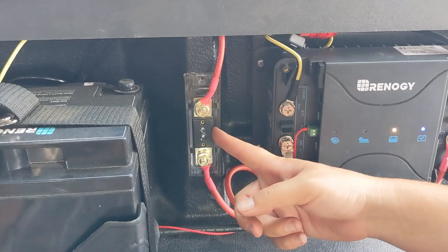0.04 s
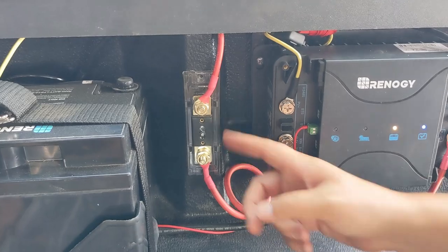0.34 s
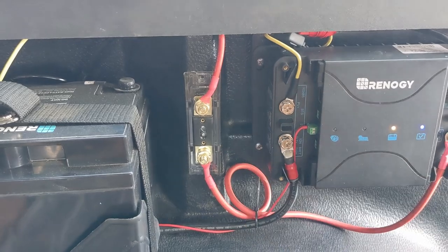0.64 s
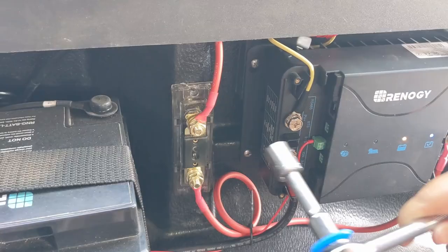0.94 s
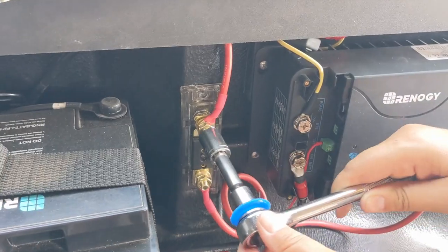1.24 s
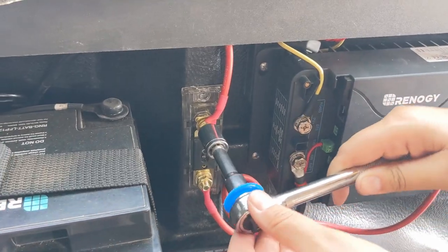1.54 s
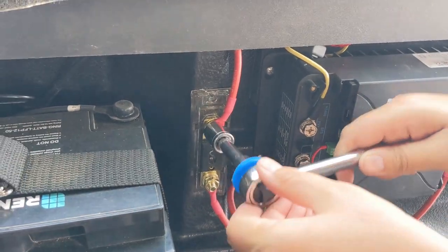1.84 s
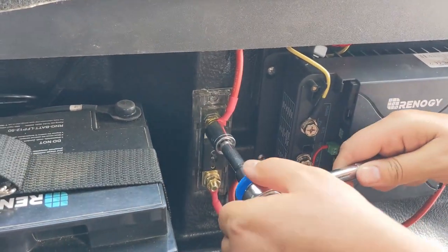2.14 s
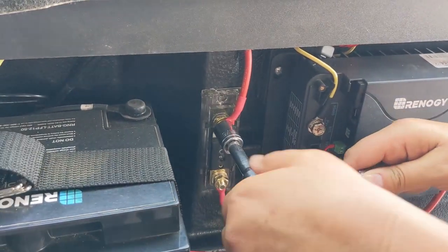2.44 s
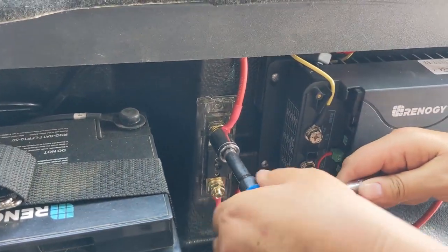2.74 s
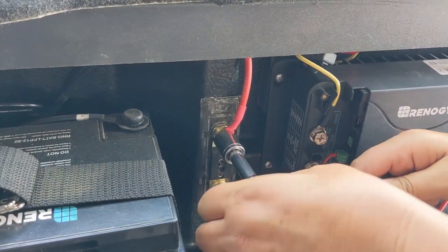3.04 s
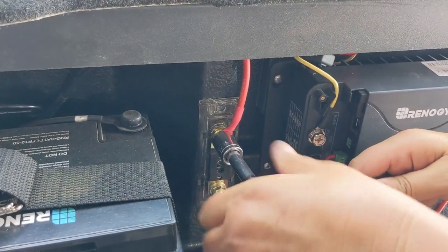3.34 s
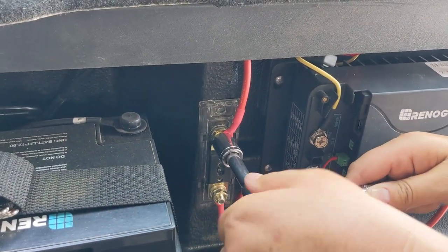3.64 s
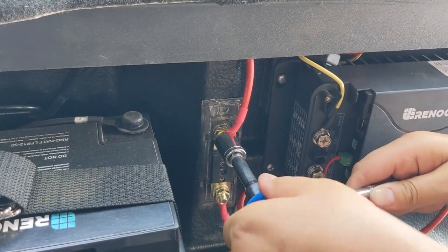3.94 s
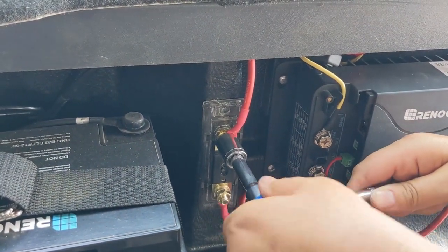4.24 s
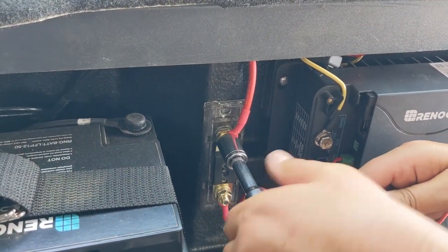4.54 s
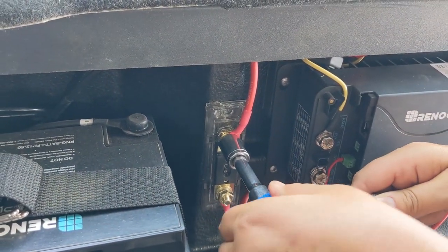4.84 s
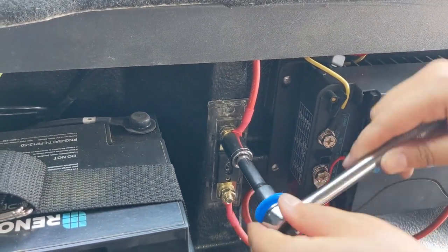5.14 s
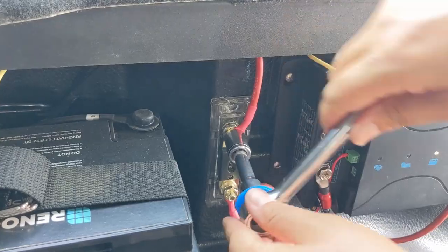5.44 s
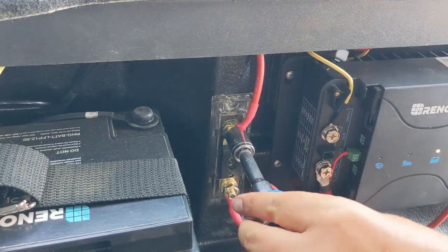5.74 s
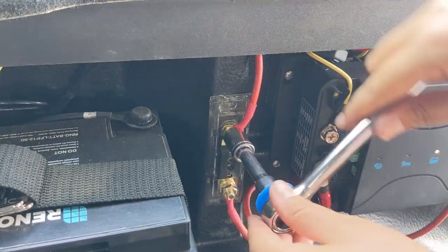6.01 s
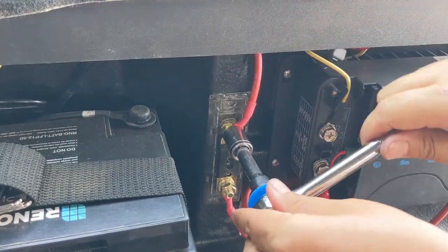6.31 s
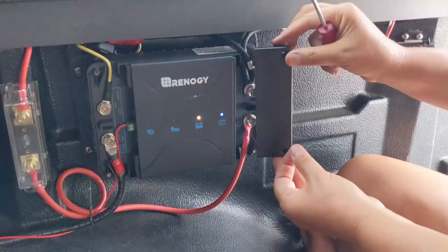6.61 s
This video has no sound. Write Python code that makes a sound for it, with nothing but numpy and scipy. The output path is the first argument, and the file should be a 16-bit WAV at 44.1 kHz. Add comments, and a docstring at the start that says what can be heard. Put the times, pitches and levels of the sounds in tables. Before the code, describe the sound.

A socket ratchet works a nut close to the microphone in a quietly rumbling vehicle cabin. First a motor hums softly and something hollow bumps, both stopping suddenly. The socket seats with a few dull knocks. Quick bursts of crisp steel clicks follow, about four a second, then scattered single ticks and taps, and finally two slightly longer, slower runs of ratchet teeth.

```python
"""Inside a vehicle, close to a phone, a socket ratchet works a nut on a fuse holder screwed to a panel.
Over the cabin rumble a motor hums, a hollow bump sounds, then both sounds cut off abruptly. The socket
knocks onto the nut, fingers spin the ratchet in short buzzing runs, and the handle swings back tooth by
tooth. Each snap of the pawl excites the modes of the steel head and, through the socket, the panel."""
import sys
import numpy as np
from scipy import signal
from scipy.fft import rfft, irfft, next_fast_len
from scipy.io import wavfile
from scipy.ndimage import map_coordinates

SR = 44100
rng = np.random.default_rng(int(sys.argv[2]) if len(sys.argv) > 2 else 0)


def transcribe(u):
    """Save the signal u as a 16-bit wav file named by the first command-line argument.

    u: samples, shape (n,) or (channels, n), limited to [-1, 1]; the rate is SR.
    q: integer samples, one column per channel.
    """
    v = np.clip(np.atleast_2d(u).T, -1, 1)
    q = np.round(v * 32767).astype(np.int16)
    wavfile.write(sys.argv[1], SR, q)


N = 294147
TIME = np.arange(N) / SR

# spectral lines of the motor: (frequency [Hz], level [dB])
HUM_LINES = [(57, -62.5), (113, -52.5), (171, -69), (226, -75.5), (339, -73.5), (400, -92), (468, -80.5),
             (565, -83.5), (872, -88.5)]
# air rushing with the motor: (frequency [Hz], gain [dB])
RUSH_SPECTRUM = [(25, 0), (65, 7), (130, 7.5), (220, -12.5), (380, -7), (600, -17), (1000, -27),
                 (2500, -33.5), (6000, -43), (15000, -53)]
# swells of a thin hiss: (start [s], end [s], level [dB])
HISS_SWELLS = [(0.032, 0.308, -71.5), (0.453, 0.602, -67.5), (0.74, 0.96, -68.5)]
# background noise of the cabin: (frequency [Hz], gain [dB])
CABIN_SPECTRUM = [(15, -42.5), (25, -17), (44, -5.5), (64, 3.5), (77, -5.5), (98, -10.5), (131, -7.5),
                  (163, -25.5), (879, -43), (978, -42.5), (1210, -45.5), (4500, -53), (15000, -62.5)]
# course of the cabin rumble: (time [s], level [dB])
RUMBLE_LEVELS = [(0.96, -62.5), (1.35, -70), (1.9, -62.5), (3.0, -65.5), (5.0, -72), (6.2, -60.5),
                 (6.67, -62.5)]
# socket and fingers striking the nut: (time [s], panel drive [dB], thump drive [dB], tick drive [dB])
NUT_KNOCKS = [(0.334, -55.5, -68, -76), (0.872, -42.5, -55, -53), (1.421, -48.5, -50.5, -61),
              (1.451, -38.5, -41, -64), (1.621, -59, -65, -88), (1.749, -51, -45.5, -74),
              (1.794, -45.5, -48, -76), (1.829, -35, -42, -38), (1.848, -42.5, -45, -54),
              (1.96, -52, -65, -89), (2.082, -71.5, -79, -73), (2.448, -52.5, -58.5, -64),
              (3.157, -50.5, -64.5, -68), (3.408, -45.5, -55, -75), (3.559, -43.5, -47.5, -70),
              (4.019, -49, -75, -71), (4.222, -43, -71, -60.5), (4.348, -50.5, -63, -85),
              (4.58, -54.5, -50.5, -81), (4.693, -49.5, -79.5, -80), (5.056, -54, -81, -87.5),
              (5.098, -47.5, -77, -71), (5.159, -46, -80.5, -67), (5.481, -45.5, -65.5, -66.5),
              (5.508, -39, -55.5, -57), (5.92, -49, -51.5, -82), (5.955, -43, -70, -63.5),
              (6.258, -41, -51.5, -45.5), (6.269, -50, -41.5, -53.5), (6.283, -41, -43.5, -72),
              (6.303, -55.5, -41.5, -75.5)]
# firmness of the socket's seat: (time [s], treble boost and bass cut [dB])
SEAT_TILT = [(1.45, -1.5), (4.5, 1), (5.3, 3), (6.0, -3.5)]
# panel and fuse holder: (frequency [Hz], bandwidth [Hz], gain [dB], left minus right [dB])
PANEL_MODES = [(154, 94, -4, 3.5), (328, 41, 0, -2.5), (396.4, 31, 4, 2), (487, 50, 1, 3.5),
               (569.6, 36, 5, -2), (629.6, 63, 4, -1), (762.5, 69, -6, 4), (856, 63, -6.5, -7),
               (990, 60, -3.5, 0.5), (1241, 170, -9, -1), (1505, 72, -10, 3), (1652, 50, -8, 0),
               (2230, 610, -20, 0)]
# wall behind the panel: (frequency [Hz], bandwidth [Hz], gain [dB], left minus right [dB])
WALL_MODES = [(52.04, 13, -1.5, 2.5), (130, 8, 4, 5.5), (169, 26, -5.5, 5), (228, 10, -12.5, 14)]
# brass stud met by metal: (frequency [Hz], bandwidth [Hz], gain [dB], left minus right [dB])
STUD_MODES = [(945, 130, 9, 0.5), (1520, 130, 5, 4.5), (1970, 310, -6, 8), (2300, 30, 4.5, -3),
              (3640, 460, -13.5, -7), (5150, 250, -4, -4.5)]
# blows that make up the stumbling bump: (time [s], drive [dB])
BUMP_BLOWS = [(0.852, -36.5), (0.866, -38.5), (0.883, -40), (0.899, -41.5)]
# hollow body that is bumped: (frequency [Hz], bandwidth [Hz], gain [dB], left minus right [dB])
HOLLOW_MODES = [(114.3, 8.8, 9.5, 3), (313, 9.8, 2, 3), (341.6, 9.6, 5.5, -2), (418.5, 8, 1.5, 2),
                (468, 21, -4, 3), (569, 9, -5.5, 4), (1262, 17, -16, 14)]
# runs of teeth, from quick finger spins to two slow swings of the handle: (start [s], end [s],
# teeth [count], slowing [0-1], steel drive [dB], swell [dB], panel drive [dB], pawl mode gain [dB])
TOOTH_RUNS = [(2.256, 2.275, 5, 0.09, -31.5, 0.5, -54.5, 9.5), (2.317, 2.351, 4, 0.06, -30.5, 1, -46, 11),
              (2.584, 2.628, 8, .3, -30.5, 4.5, -48.5, 19.5), (2.826, 2.866, 6, 0, -28.5, 2.5, -46.5, 6),
              (3.045, 3.125, 12, 0.24, -36, 3, -47.5, 0), (3.29, 3.358, 14, .1, -32.5, -9.5, -49.5, -7.5),
              (3.517, 3.577, 9, 0.04, -33, 8.5, -44.5, 18.5), (3.772, 3.831, 11, .1, -32, 2.5, -44, 9),
              (4.059, 4.104, 6, 0.33, -36.5, -6, -44.5, 22), (5.192, 5.3554, 7, .11, -31, 0, -42.5, -6),
              (5.992, 6.111, 8, .14, -33.5, -4, -44.5, 17)]
# teeth that slip past the pawl alone: (time [s], steel drive [dB], panel drive [dB])
SINGLE_TEETH = [(2.2925, -30.5, -44), (2.379, -36.5, -58.5), (2.5276, -52.5, -65), (2.6451, -33, -51),
                (2.8892, -30, -44), (3.0649, -27.5, -46), (3.601, -29.5, -44.5), (3.8428, -27.5, -44),
                (4.129, -34.5, -43.5), (4.3972, -33.5, -41.5), (4.4386, -34, -42), (4.5297, -33, -36.5),
                (4.8739, -33, -38.5), (4.9381, -32.5, -38), (6.135, -28.5, -42.5)]
# hold of the fingers on the head: (time [s], grip [0 light to 1 tight])
GRIP_TIGHTNESS = [(2.32, 0.68), (2.75, 0.017), (3.12, 0.49), (3.85, 0.053), (4.1, 0.18), (4.45, 1),
                  (4.9, 0.31), (5.3, 0.51), (6.05, 0.78)]
# ratchet head: (frequency [Hz], bandwidth [Hz], gain [dB], change in a tight grip [dB])
HEAD_MODES = [(4176, 107, 13.5, -9.5), (4393, 120, 7, -8.5), (7690, 110, 5.5, 10.5),
              (12123, 230, 10.5, 12.5)]
# socket and extension bar: (frequency [Hz], bandwidth [Hz])
BAR_MODES = [(5945, 190), (8130, 260), (9070, 120), (9800, 430)]
# broad snap of steel on steel: (frequency [Hz], gain [dB])
SNAP_SPECTRUM = [(300, -21.5), (1200, -8), (2700, -13), (3400, -35.5), (4400, 6.5), (5000, -3),
                 (6000, -0.5), (6900, -1.5), (8200, 3), (9900, -0.5), (10800, -1.5), (12600, 5.5),
                 (14000, -18), (15600, -15)]


def undb(db):
    """Decibels express an amplitude ratio logarithmically; this returns the ratio."""
    return 10 ** (np.asarray(db) / 20)


def panned(db, pan_db):
    """Interchannel level difference: left and right gains lie pan_db apart."""
    return undb(db + np.array([[pan_db], [-pan_db]]) / 2)


def curve(points):
    """Linear interpolation of (time [s], value) points at every sample."""
    return np.interp(TIME, *np.transpose(points))


def unit(x):
    """Normalisation to unit mean power."""
    return x / np.sqrt(np.mean(x ** 2))


def drift(rate_hz):
    """Random modulation: Gaussian values joined by straight lines."""
    return np.interp(TIME * rate_hz, np.arange(2048), rng.standard_normal(2048))


def noise(shared):
    """Partial coherence: white noise at two microphones shares a fraction of its power."""
    return np.sqrt(shared) * rng.standard_normal(N) + np.sqrt(1 - shared) * rng.standard_normal((2, N))


def colour(x, points):
    """Minimum-phase filtering through (frequency [Hz], gain [dB]) points."""
    hz, db = np.transpose(points)
    size = next_fast_len(N + SR // 2) * 2
    bin_hz = np.arange(size // 2 + 1) * SR / size
    cepstrum = irfft(np.interp(np.log(bin_hz + 1), np.log(hz), np.log(undb(db))))
    # folding the cepstrum makes the response causal
    cepstrum[1:size // 2] *= 2
    cepstrum[size // 2 + 1:] = 0
    return irfft(rfft(x, size) * np.exp(rfft(cepstrum)))[..., :N]


def resonate(x, hz, width):
    """Resonance of one damped mode, with unit gain at its centre."""
    return signal.lfilter(*signal.iirpeak(hz, hz / width, fs=SR), x)


def body(force, modes):
    """Modal superposition with alternating signs, roughly keeping the power of white noise."""
    power = sum(undb(db) ** 2 * np.pi * width / SR for _, width, db, _ in modes)
    return sum((-1) ** k * panned(db, pan_db) * resonate(force, hz, width)
               for k, (hz, width, db, pan_db) in enumerate(modes)) / np.sqrt(power)


def impulses(times, db):
    """Impulsive excitation: each blow lasts one sample."""
    return np.bincount((np.asarray(times) * SR).astype(int), undb(db), N)


def contacts(times, levels_db, pans_db, lead_db, rise_s, fall_s, tail_db, tail_s):
    """Incoherent addition of envelopes: each click swells for a few milliseconds, snaps and dies away."""
    power = np.zeros((2, N))
    for at, db, pan_db in np.broadcast(times, levels_db, pans_db):
        span = slice(max(int(at * SR) - SR // 20, 0), int(at * SR) + SR // 8)
        t = abs(TIME[span] - at)
        lead_in = undb(lead_db) * np.exp(-t / rise_s)
        decay = np.exp(-t / fall_s) + undb(tail_db) * np.exp(-t / tail_s)
        power[:, span] += (panned(db, pan_db) * np.where(TIME[span] < at, lead_in, decay)) ** 2
    return np.sqrt(power)


def motor(waver=0.0036):
    """A line spectrum under slight frequency modulation hums over rushing air and a thin hiss."""
    phase_per_hz = 2 * np.pi * np.cumsum(1 + waver * drift(11)) / SR
    hum = sum(undb(db) * np.sqrt(2) * np.sin(hz * phase_per_hz + rng.uniform(0, 2 * np.pi))
              for hz, db in HUM_LINES)
    rush = undb(-57.5) * unit(colour(noise(0.21), RUSH_SPECTRUM))
    fade_s = 0.053
    swells = sum(undb(db) * (np.tanh((TIME - start) / fade_s) - np.tanh((TIME - end) / fade_s)) / 2
                 for start, end, db in HISS_SWELLS)
    hiss = colour(noise(0.062), [(300, -12), (1500, 2.5), (6000, 3.5), (12000, 2.5), (15500, -2)])
    return hum * undb([[1.3], [-1.2]]) + rush + swells * unit(hiss)


def cabin(air_db=-74.5, drift_db=0.5):
    """Ambient noise in two bands: the rumble is more coherent between channels than the faint air."""
    lowpass = signal.butter(2, 220, fs=SR, output="sos")
    highpass = signal.butter(2, 260, "high", fs=SR, output="sos")
    rumble = unit(signal.sosfilt(lowpass, colour(noise(0.34), CABIN_SPECTRUM)))
    air = unit(signal.sosfilt(highpass, colour(noise(0.19), CABIN_SPECTRUM)))
    return undb(curve(RUMBLE_LEVELS)) * rumble + undb(air_db + drift_db * drift(5)) * air


def panel(force, pivot_hz=640):
    """Contact stiffness tilts the drive of the panel: a firm seat favours highs, a soft one lows."""
    low = signal.sosfiltfilt(signal.butter(2, pivot_hz, fs=SR, output="sos"), force)
    tilt = undb(curve(SEAT_TILT))
    return body(low / tilt + (force - low) * tilt, PANEL_MODES)


def knocks():
    """Impacts on the nut excite coupled bodies: the panel knocks, the wall thumps, the stud rings."""
    times, panel_db, thump_db, tick_db = np.vstack([NUT_KNOCKS, fumbles()]).T
    push = noise(0.21) * contacts(times, panel_db, pans_db=0, lead_db=-4.5, rise_s=0.0088,
                                  fall_s=0.005, tail_db=-17.5, tail_s=0.023)
    touch = noise(0) * contacts(times, tick_db, pans_db=1.5, lead_db=-5, rise_s=0.003,
                                fall_s=0.006, tail_db=-24, tail_s=0.016)
    tick = colour(touch, [(400, -13.5), (1500, -5), (2500, 2), (4200, -5.5), (7000, 1.5),
                          (11000, -11), (15500, -12)])
    thump = colour(impulses(times, thump_db), [(20, -4), (200, 1), (600, -18.5), (3000, -54.5)])
    wall = undb(25.5) * body(thump, WALL_MODES)
    stud = undb(4) * body(touch, STUD_MODES)
    return undb(2) * panel(push) + wall + undb(3.5) * tick + stud


def bump():
    """Free vibration: a hollow body booms after each of a few soft blows."""
    push = colour(impulses(*np.transpose(BUMP_BLOWS)), [(20, 8), (1300, 0), (2500, -1), (8000, -12)])
    return undb(25) * body(push, HOLLOW_MODES)


def fumbles(start_s=1.56, end_s=5.6, per_s=9, scatter_db=7.5):
    """Random excitation: fingers touch the tool faintly at uneven times, in rows like NUT_KNOCKS."""
    slots = np.arange(start_s, end_s, 1 / per_s)
    late, loud = rng.uniform(0, 1, (len(slots), 2)).T
    drives_db = np.add.outer(scatter_db * (2 * loud - 1), (-63, -71, -89))
    return np.column_stack([slots + late / per_s, drives_db])


def teeth(jitter_s=0.00046, scatter_db=1, pan_db=2.5, pan_scatter_db=2):
    """An impact train: (time [s], steel drive [dB], panel drive [dB], left minus right [dB])."""
    rows = list(SINGLE_TEETH)
    rebound = [0.008, -12, -5.5]  # the pawl strikes again: (delay [s], steel [dB], panel [dB])
    for start, end, count, slowing, steel_db, swell_db, panel_db, _ in TOOTH_RUNS:
        turn = np.linspace(0, 1, count)
        late, loud = rng.standard_normal((count, 2)).T
        elapsed = turn - slowing * turn * (1 - turn)  # gaps widen as the hand slows
        times = start + (end - start) * elapsed + jitter_s * late
        snap_db = steel_db + swell_db * (turn - 0.5) + scatter_db * loud
        run = np.column_stack([times, snap_db, np.full(count, panel_db)])
        rows += [*run, *(run[:-1] + rebound)]
    return np.column_stack([rows, pan_db + pan_scatter_db * rng.standard_normal(len(rows))])


def steel_ring(force, pawl_hz=9280, pawl_width_hz=180, vary_db=2.5):
    """Modal response of head, pawl and bar; a tight grip shifts the head's ring to its high modes."""
    grip = curve(GRIP_TIGHTNESS)
    pawl_db = curve([(edge, run[-1]) for run in TOOTH_RUNS for edge in run[:2]])
    modes = [(hz, width, db + grip * grip_db) for hz, width, db, grip_db in HEAD_MODES]
    modes.append((pawl_hz, pawl_width_hz, pawl_db))
    # every tooth weights the modes a little differently
    head = sum(undb(db + vary_db * drift(60)) * resonate(force, hz, width) for hz, width, db in modes)
    bar = sum(undb(5.3 * drift(20)) * resonate(force, hz, width) for hz, width in BAR_MODES)
    return colour(force, SNAP_SPECTRUM) + undb(-0.3) * head + undb(-3) * bar


def reflections(x, echo_db=-6, far_s=0.0017, drift_s=0.00004, count=4):
    """Early reflections from close surfaces reach each microphone; delays shift as the hands move."""
    out = x.copy()
    for ear in range(2):
        for lag_s in rng.uniform(far_s / 10, far_s, count):
            position = (TIME - lag_s - drift_s * drift(3)) * SR
            out[ear] += undb(echo_db) * map_coordinates(x[ear], [position], order=3)
    return out / np.sqrt(1 + count * undb(echo_db) ** 2)


def ratchet(grain_db=0.1, crack_db=1.5, crack_s=0.00034):
    """Impact excitation: the pawl snaps off each tooth, ringing the steel and shaking the panel."""
    times, steel_db, panel_db, pan_db = teeth().T
    click_envelope = contacts(times, steel_db, pan_db + 1.5, lead_db=-3, rise_s=0.0037,
                              fall_s=0.0034, tail_db=-15, tail_s=0.008)
    crack = signal.lfilter([1], [1, -np.exp(-1 / (crack_s * SR))], impulses(times, steel_db + crack_db))
    force = noise(0) * np.hypot(click_envelope * undb(grain_db * drift(280)), crack)
    steel = reflections(steel_ring(force))
    shake = noise(0.11) * contacts(times, panel_db, pans_db=0, lead_db=-4.5, rise_s=0.0041,
                                   fall_s=0.0053, tail_db=-14, tail_s=0.016)
    return undb(-1) * steel + undb(2.5) * panel(shake)


def scene(cut_at_s=0.94, fade_s=0.00252, resume_s=1.2):
    """Superposition: the sound of motor, bump and knocks cuts off abruptly, then the knocks resume."""
    opening = np.clip((cut_at_s - TIME) / fade_s, 0, 1)
    working = TIME > resume_s
    return opening * (motor() + bump()) + (opening + working) * knocks() + ratchet() + cabin()


def record(dry, top_hz=15950):
    """Band limiting: the phone cuts the highest treble steeply."""
    return signal.sosfilt(signal.ellip(10, 0.2, 80, top_hz, fs=SR, output="sos"), dry)


dry = scene()
out = record(dry)
transcribe(out)
```